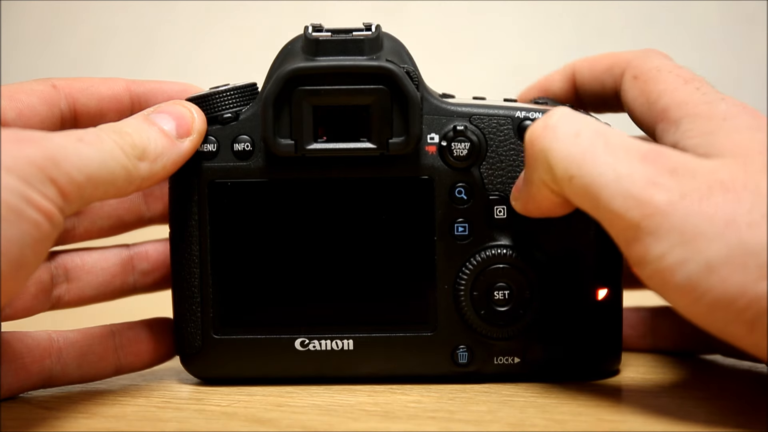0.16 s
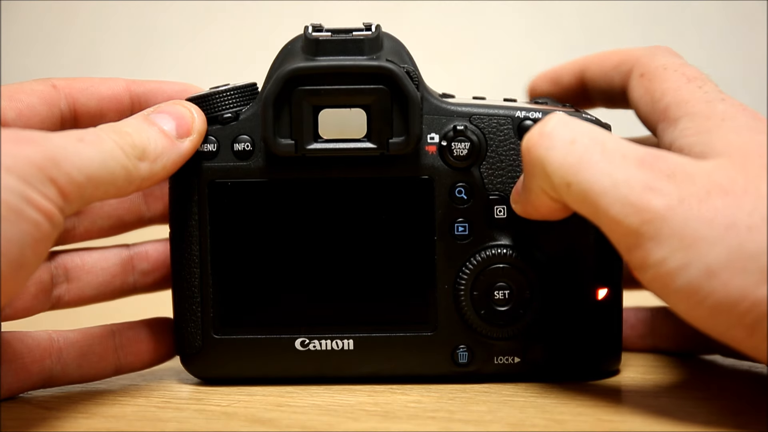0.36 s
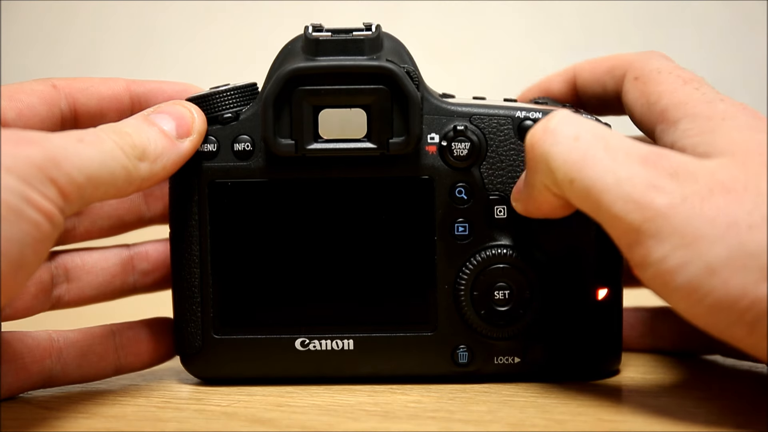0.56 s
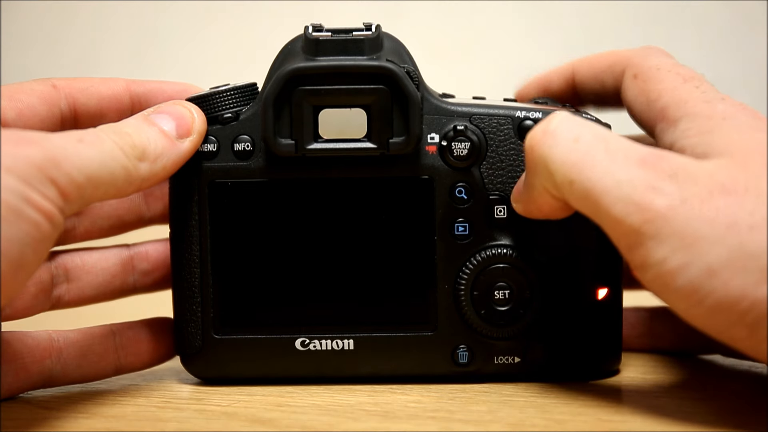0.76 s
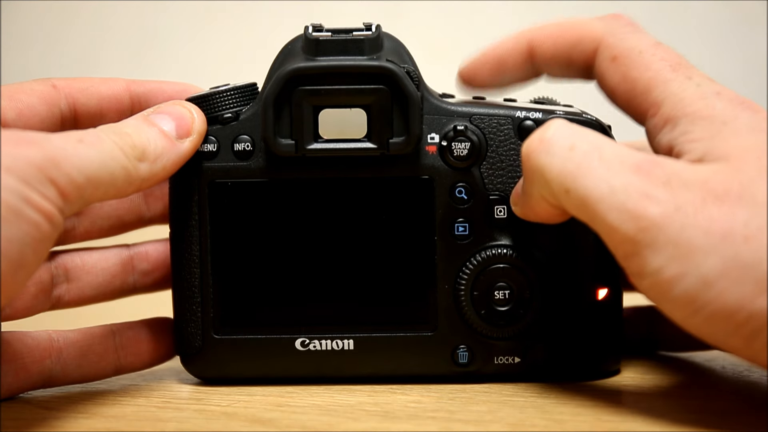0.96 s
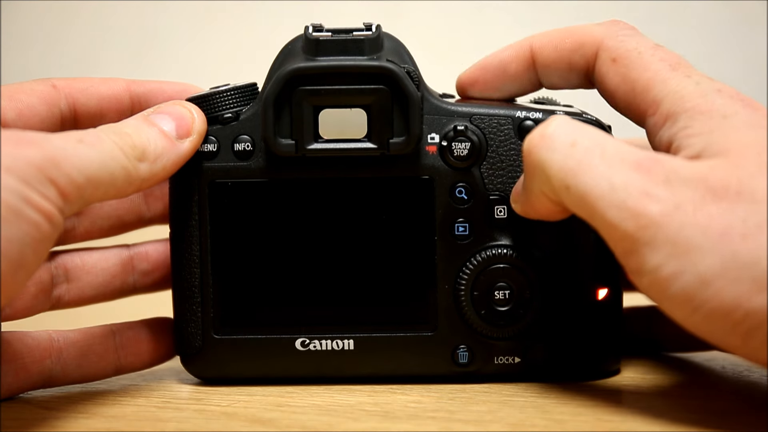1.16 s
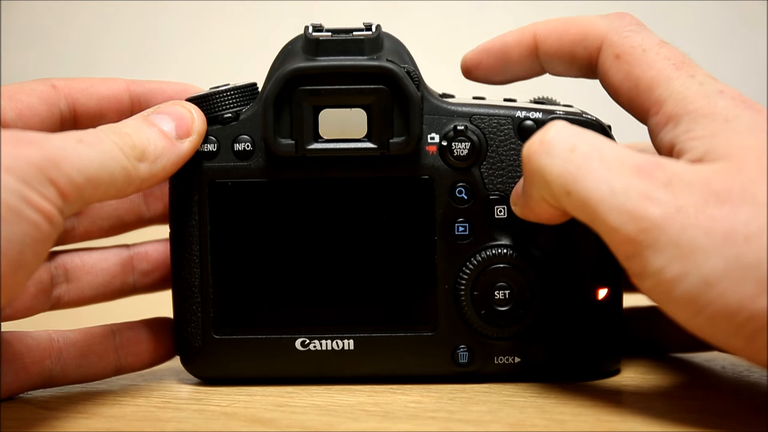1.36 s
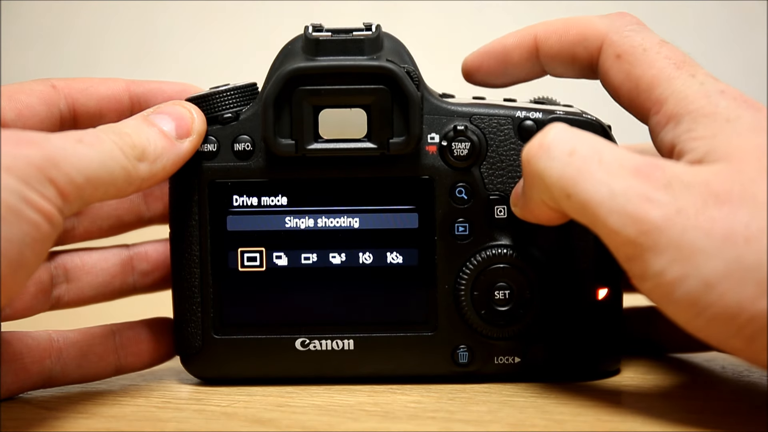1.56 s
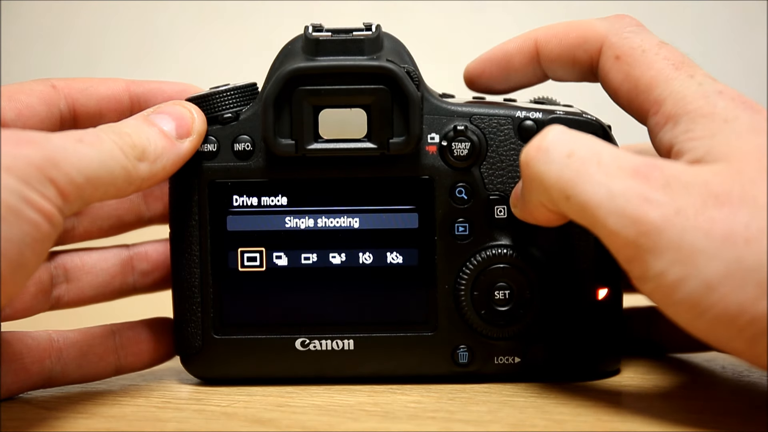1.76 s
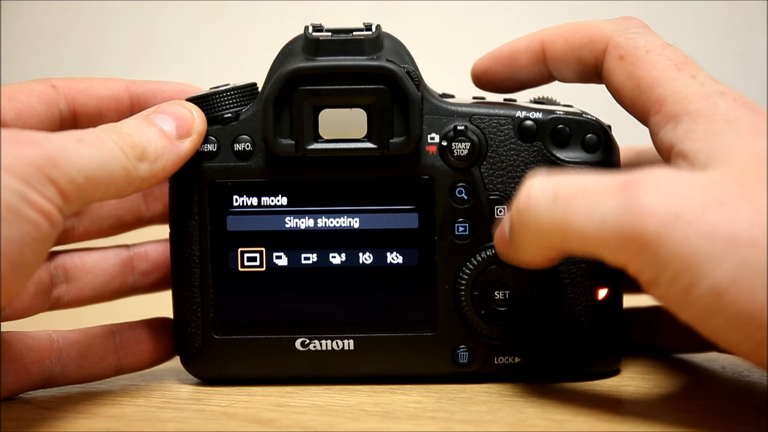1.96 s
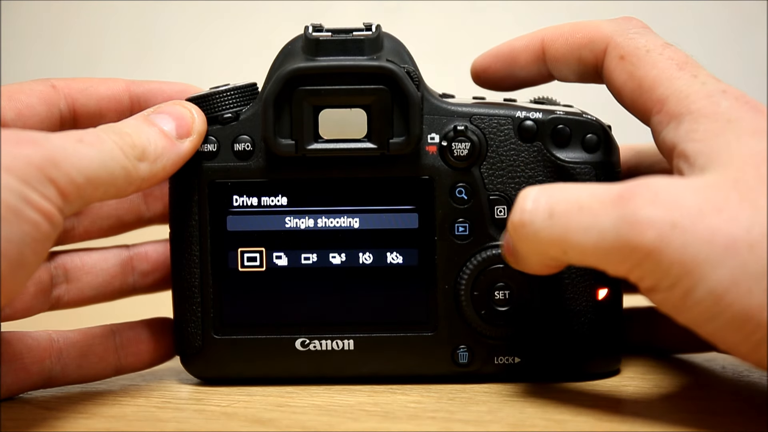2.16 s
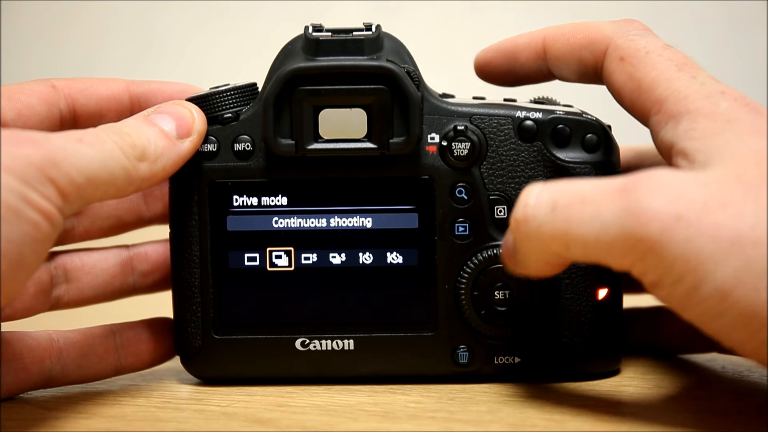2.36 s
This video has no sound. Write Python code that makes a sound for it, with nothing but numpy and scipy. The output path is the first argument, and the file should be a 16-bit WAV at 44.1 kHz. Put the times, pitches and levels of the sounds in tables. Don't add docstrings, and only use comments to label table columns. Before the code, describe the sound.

A reflex camera shutter fires twice in the first second, each a sharp double-beat metallic clack with a brief whirr; then faint button ticks and soft bumps follow in a quiet room, recorded close.

```python
import sys
import numpy as np
from scipy import signal
from scipy.fft import rfft, irfft, next_fast_len
from scipy.io import wavfile

SR = 44100
rng = np.random.default_rng(int(sys.argv[2]) if len(sys.argv) > 2 else 0)


def convert_level_to_amplitude(level_db):
    exponent = np.asarray(level_db, float) / 20
    return 10 ** exponent


def wav_record(signal):
    frames = np.transpose(np.atleast_2d(signal))
    bounded = np.clip(frames, -1, 1)
    quanta = np.round(bounded * 32767).astype(np.int16)
    wavfile.write(sys.argv[1], SR, quanta)


N = 110250

# pitch in Hz, level in dB.
RUMBLE_COLOUR = [(20, -2), (45, -7.5), (100, -0.5), (200, 1.5), (380, -5.5), (700, -1.5), (1000, -22)]
# pitch in Hz, level in dB.
HISS_COLOUR = [(470, -37), (800, -21.5), (1120, -5.5), (1610, -6), (8990, -10.5), (16000, -18)]
# pitch in Hz, width in Hz, level in dB.
DRONES = [(242, 21, -67), (307.3, 35, -62), (376.4, 61, -68), (679.4, 28, -69.5), (1110, 27, -75)]
# time in seconds, level in dB.
DRONE_SWELL = [(0, -6), (1.2, 2), (1.45, 1.5), (1.7, 2), (1.9, -4), (2.2, -4), (2.5, -3)]
# start in seconds, pitch in Hz, level in dB, swell in seconds, time to fade by 60 dB in seconds.
NUDGES = [(1.384, 116, -51.5, 0.0085, 0.3), (1.385, 75, -48, .015, 0.22), (2.074, 116.4, -52, 0.014, 0.34),
          (2.077, 80, -47.5, 0.0085, 0.18), (2.2435, 5430, -52, 0.001, 0.018),
          (2.258, 5430, -52, .001, 0.016), (2.275, 4850, -52, .001, .016), (2.280, 5490, -56, .0006, .04),
          (1.0714, 1350, -60, 0.001, 0.026), (2.073, 834, -57, .002, 0.042),
          (2.074, 528, -64, 0.0022, 0.031), (1.069, 5640, -49, .0002, 0.0045),
          (1.0695, 4700, -51, 0.00021, 0.0053), (2.245, 1590, -57, .0005, .01),
          (2.278, 1200, -55, .0005, .01)]
# start in seconds after release, then as in NUDGES.
TABLE_HUMS = [(0.0151, 82.2, -29.5, 0.018, 0.43), (0.0182, 116.7, -20.5, 0.012, 0.22),
              (0.0513, 117, -22.5, .01, 0.062), (0.0218, 193.3, -40, 0.0022, 0.46),
              (0.024, 284, -36.5, 0.0063, 0.34), (.125, 191, -38, 0.0065, 0.26),
              (0.028, 359, -30.5, 0.0051, 0.096), (0.061, 540, -28.5, 0.00094, 0.031),
              (0.21, 750, -62, 0.032, 0.56), (.132, 580, -30, 0.00065, 0.12),
              (0.136, 358.3, -23.5, 0.0048, 0.062), (0.149, 325.6, -37, 0.035, 0.52),
              (0.144, 359.8, -38, 0.017, 0.43), (0.15, 121, -32, 0.018, 0.29),
              (0.18, 440, -34.5, 0.0047, 0.16), (0.18, 220, -44.5, 0.008, 0.27),
              (.17, 555, -47, 0.0021, 0.31), (0.202, 1300, -61.5, 0.034, 0.59)]
# start in seconds after release, then as in NUDGES.
PLATES = [(-.003, 1040, -32, .002, 0.14), (-.003, 553.7, -28, 0.0048, 0.064),
          (-.002, 692, -32, 0.0022, 0.06), (.0, 3180, -17.5, .0006, 0.017), (.0, 1900, -58, 0.00086, .05),
          (.0, 5000, -27, 0.00064, 0.014), (.021, 1943, -19, 0.00081, 0.017),
          (.023, 8300, -21.5, .0005, .015), (.016, 631, -19.5, 0.005, 0.055),
          (.108, 976, -27, 0.0021, 0.024), (.051, 1345, -34, 0.0011, 0.033)]
# pitch in Hz, level in dB.
METAL_MODES = [(4500, -34), (5100, 0.5), (5500, -9.5), (5900, -5), (6400, -1.5), (6850, 1.5), (7400, -0.5),
               (7800, -12), (8250, -2), (8700, -2), (9400, -3), (10200, -4.5), (11200, -13), (12500, -36)]
# pitch in Hz, level in dB.
SHELL_MODES = [(560, 6), (660, 0.5), (830, -11), (1040, -4.5), (1180, -1), (1280, 5), (1430, -2.5),
               (1650, -7), (1900, 2.5), (2300, -6), (2750, 5), (3100, 3), (3400, 3)]
# start in seconds, metal level in dB, shell level in dB,
# brightest metal pitch in Hz, loudest shell pitch in Hz.
BUTTONS = [(.002, -59, -32.5, 5000, 866), (.160, -42, -49, 5000, 3100), (.186, -47, -70, 6300, 3000),
           (1.0696, -45.5, -35.5, 5370, 1310), (1.0697, -65, -50, 5000, 2800),
           (1.405, -61, -48, 5000, 1210), (2.076, -67, -41, 5000, 1200), (2.2445, -42, -47, 5700, 2000),
           (2.259, -44, -56, 6000, 2800), (2.2765, -39, -47.5, 5030, 2900), (2.280, -41, -50, 6130, 2820),
           (2.372, -62, -43.5, 5000, 2450)]
# pitch in Hz, level in dB.
GEAR_COLOUR = [(500, 1.5), (1250, 1), (2200, -2.5), (3100, 2.5), (4100, -8.5), (6800, 3), (9500, -7),
               (13000, -52)]
# time in seconds after release, level in dB.
GEAR_LOUDNESS = [(-.008, -59), (.008, -36), (.030, -34), (0.043, -47), (.07, -45.5), (.095, -37.5),
                 (.155, -39.5), (0.185, -46), (0.25, -77.5)]
# start in seconds after release, then as in BUTTONS.
CONTACTS = [(-.0042, -45, -23, 7000, 900), (0., -3, -12, 6000, 3000), (.002, -22, -25, 8000, 1100),
            (.0055, -15, -28, 7000, 1900), (.009, -24, -34, 7000, 1500), (.0125, -15, -30, 7000, 1500),
            (.016, -21, -32, 7500, 1900), (.0188, -19, -24, 7500, 1500), (.0213, -16, -14.5, 7000, 1900),
            (.0236, -8, -14.5, 8600, 2500), (0.0283, -20, -23, 8000, 1500), (0.033, -22, -34, 7500, 1900),
            (0.037, -22, -40, 8500, 1300), (.0508, -9.5, -18, 7200, 1700), (.0771, -8.5, -18, 6800, 1300),
            (.055, -24, -28, 7000, 1400), (.0815, -21, -25, 6500, 1300), (.086, -24, -28, 6500, 1300),
            (.092, -29, -25, 6500, 1300), (.100, -27, -28, 5500, 1300), (0.104, -13, -30, 7950, 2970),
            (.1075, -10.5, -13, 7500, 1300), (.111, -13, -16, 7500, 2800), (.115, -22, -28, 8000, 1300),
            (.119, -16, -23, 7500, 1300), (.123, -22, -30, 8500, 1300), (0.1331, -12, -16, 6500, 3100),
            (.1385, -14, -15, 7500, 1310), (.142, -19, -17, 6500, 2800), (.148, -19, -21, 6500, 1270),
            (.154, -17, -26, 6800, 2980), (.159, -24, -27, 7000, 3000), (.177, -31, -34, 7000, 1300)]
# release in seconds, level in dB.
SHOTS = [
    (0.2159, -2.5),
    (0.6805, -2.5),
]

RUMBLE_DB, HISS_DB = -59.5, -60.5
ROOM_T60_S, ROOM_DB, WALL_CUT_HZ = 0.3, -24, 9000
TABLE_WAVER_DB, BASS_CUT_HZ = 1.5, 136
METAL_MAX_T60_S, SHELL_MAX_T60_S = 0.010, 0.022
METAL_SPREAD_OCT, SHELL_SPREAD_OCT, BUTTON_SPREAD_OCT = 0.66, 1, 0.26
RATTLE_S, BUTTON_RATTLE_S, RATTLE_FADE_DB = 0.0024, 0.0008, 12
FRESH = 0.41
CRACK_DB, CRACK_T60_S = -10, 0.023
GEAR_CLICKS_PER_S, GEAR_CYCLES, GEAR_PITCHES = 24000, 20, 30
TOP_HZ = 16400


def in_band(x, low_hz, high_hz):
    limits = [low_hz, min(high_hz, 0.45 * SR)]
    return signal.sosfilt(signal.butter(2, limits, "band", fs=SR, output="sos"), x)


def rms_one(x):
    return x / np.sqrt(np.mean(x ** 2) + 1e-20)


def drift(rate_hz):
    r = np.exp(-80 * np.pi * rate_hz / SR)
    noise = rng.standard_normal(N // 40 + 2002)
    slow = signal.lfilter([1], [1, -2 * r, r * r], noise)[2000:]
    return np.interp(np.arange(N) / 40, np.arange(len(slow)), rms_one(slow))


def ring(clicks, hz, t60_s):
    r = convert_level_to_amplitude(-60 / (t60_s * SR))
    w = 2 * np.pi * hz / SR
    return signal.lfilter([0, np.sin(w)], [1, -2 * r * np.cos(w), r * r], clicks + 1e-18)


def coloured(spectrum, patchy_db):
    hz, db = np.transpose(spectrum)
    edges = np.geomspace(hz[0], hz[-1], 11)
    white = rng.standard_normal((2, N))
    out = np.zeros(N)
    for k, (low, high) in enumerate(zip(edges, edges[1:])):
        level_db = np.interp(np.log(low * high) / 2, np.log(hz), db)
        out += convert_level_to_amplitude(level_db + patchy_db * drift(4)) * in_band(white[k % 2], low, high)
    return rms_one(out)


def background():
    swell_db = np.interp(np.arange(N) / SR, *np.transpose(DRONE_SWELL))
    out = convert_level_to_amplitude(RUMBLE_DB) * coloured(RUMBLE_COLOUR, patchy_db=1.5)
    out += convert_level_to_amplitude(HISS_DB) * coloured(HISS_COLOUR, patchy_db=0.84)
    for hz, width_hz, db in DRONES:
        drone = rms_one(ring(rng.standard_normal(N), hz, 4.4 / width_hz))
        out += convert_level_to_amplitude(db + swell_db * (hz < 500)) * drone
    return out


def room(x):
    size = next_fast_len(N + SR // 4)
    hz = np.arange(size // 2 + 1) * SR / size
    echoes = 0
    for k, lag_s in enumerate(rng.uniform(0.006, 0.03, size=24)):
        dulling = 1 + 1j * hz / WALL_CUT_HZ * 2 * lag_s / 0.02
        once = convert_level_to_amplitude(-60 * lag_s / ROOM_T60_S) / dulling * np.exp(-2j * np.pi * hz * lag_s)
        echoes = echoes + once / (1 - once) * (-1) ** k
    return irfft(rfft(x, size) * echoes, size)[:N]


def table_top(rows):
    out = np.zeros(N)
    for start_s, hz, db, swell_s, t60_s in rows:
        t = np.maximum(np.arange(N) / SR - start_s, 0)
        fade = convert_level_to_amplitude(db - 60 * t / t60_s + TABLE_WAVER_DB * drift(32))
        rise = (1 - np.exp(-t / swell_s)) ** 2
        out += fade * rise * 3 * np.sin(2 * np.pi * hz * t)
    return out


def near(hz, centre_hz, spread_oct):
    return np.exp(-0.5 * (np.log2(hz / centre_hz) / spread_oct) ** 2)


def contacts(rows, shots, metal_spread_oct, shell_spread_oct, rattle_s, count=8):
    start_s, metal_db, shell_db, metal_hz, shell_hz = np.transpose(rows)[:, :, None]
    late = rng.uniform(0, 1, (len(rows), count)) * (np.arange(count) > 0)
    share = (np.arange(count) + late) / count
    fade = convert_level_to_amplitude(-RATTLE_FADE_DB * share - 15)

    def touches(level, hz):
        same = rng.choice([-1, 1], share.shape)
        turns = np.exp(-2j * np.pi * hz * rattle_s * share)
        clicks = np.zeros(N)
        for shot_s, shot_db in shots:
            size = fade * (same + FRESH * rng.standard_normal(share.shape))
            left = np.abs(np.sum(size * turns, axis=1, keepdims=True))
            expected = np.sqrt(np.sum(fade ** 2, axis=1, keepdims=True))
            evened = np.clip(expected / left, 0.5, 2)
            at = ((shot_s + start_s + rattle_s * share) * SR).astype(int)
            np.add.at(clicks, at, level * convert_level_to_amplitude(shot_db) * size * evened)
        return clicks

    out = np.zeros(N)
    metal = (METAL_MODES, metal_db, metal_hz, metal_spread_oct, METAL_MAX_T60_S)
    shell = (SHELL_MODES, shell_db, shell_hz, shell_spread_oct, SHELL_MAX_T60_S)
    for modes, db, centre_hz, spread_oct, longest_s in (metal, shell):
        for hz, mode_db in modes:
            level = convert_level_to_amplitude(db + mode_db) * near(hz, centre_hz, spread_oct)
            t60_s = longest_s * min(1, (centre_hz.mean() / hz) ** 0.5)
            out += ring(touches(level, hz), hz, t60_s)
    hits = np.abs(touches(convert_level_to_amplitude(metal_db + CRACK_DB), 5060))
    crack = signal.lfilter([1], [1, -convert_level_to_amplitude(-60 / (CRACK_T60_S * SR))], hits + 1e-18)
    return out + in_band(crack * rng.standard_normal(N), 3600, 9100)


def buttons():
    return contacts(BUTTONS, [(0.0011, 0)], BUTTON_SPREAD_OCT, BUTTON_SPREAD_OCT, BUTTON_RATTLE_S)


def gears():
    s, db = np.transpose(GEAR_LOUDNESS)
    gain = np.zeros(N)
    for shot_s, shot_db in SHOTS:
        gain += convert_level_to_amplitude(np.interp(np.arange(N) / SR - shot_s, s, db + shot_db, left=-120, right=-120))
    chosen = rng.random(N) < GEAR_CLICKS_PER_S / SR
    clicks = gain * chosen * rng.standard_normal(N)
    dealt = rng.integers(0, GEAR_PITCHES, N)
    colour_hz, colour_db = np.transpose(GEAR_COLOUR)
    out = np.zeros(N)
    for k, hz in enumerate(np.geomspace(colour_hz[0], colour_hz[-1], GEAR_PITCHES)):
        level = convert_level_to_amplitude(np.interp(np.log(hz), np.log(colour_hz), colour_db)) * np.sqrt(hz / 3000)
        out += level * ring(clicks * (dealt == k), hz, GEAR_CYCLES / hz)
    return out


def firings():
    return contacts(CONTACTS, SHOTS, METAL_SPREAD_OCT, SHELL_SPREAD_OCT, RATTLE_S) + gears()


def scene():
    pushes = list(NUDGES)
    for shot_s, shot_db in SHOTS:
        for start_s, hz, db, swell_s, t60_s in [*TABLE_HUMS, *PLATES]:
            pushes.append((shot_s + start_s, hz, db + shot_db, swell_s, t60_s))
    camera = in_band(firings() + buttons(), 220, 14800)
    bass_cut = signal.butter(2, BASS_CUT_HZ, "high", fs=SR, output="sos")
    hums = signal.sosfilt(bass_cut, table_top(pushes))
    mix = camera + convert_level_to_amplitude(ROOM_DB) * room(camera) + hums + background()
    return mix[None]


def low_pass(x):
    return signal.sosfilt(signal.butter(12, 16810, fs=SR, output="sos"), x)


def record(dry):
    top_cut = signal.cheby2(10, 45, TOP_HZ + 400, fs=SR, output="sos")
    return low_pass(signal.sosfilt(top_cut, dry))


dry = scene()
out = record(dry)
wav_record(out)
```